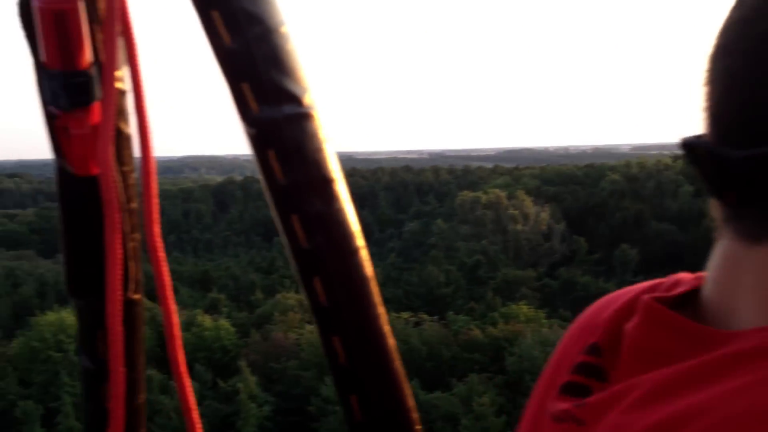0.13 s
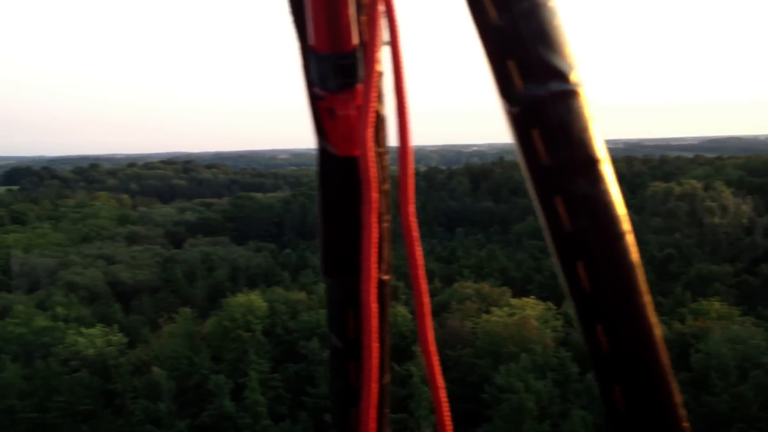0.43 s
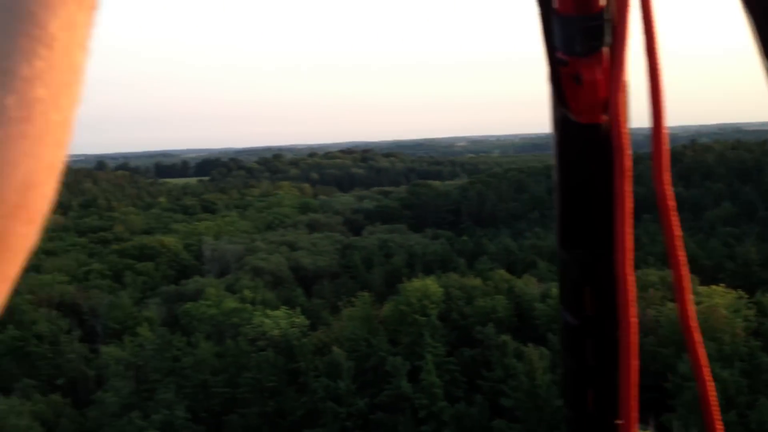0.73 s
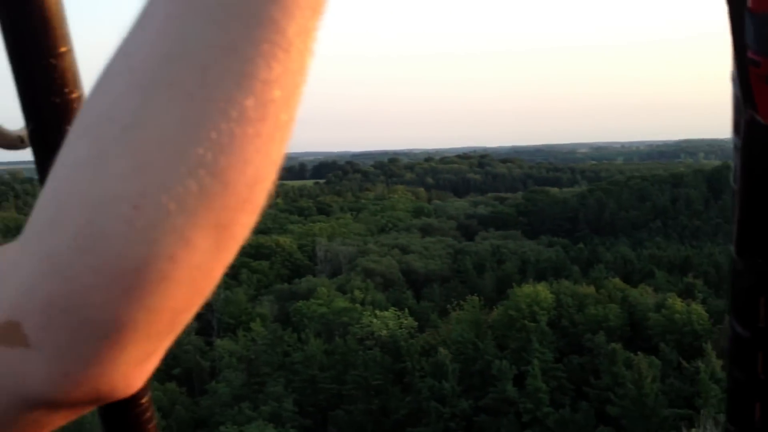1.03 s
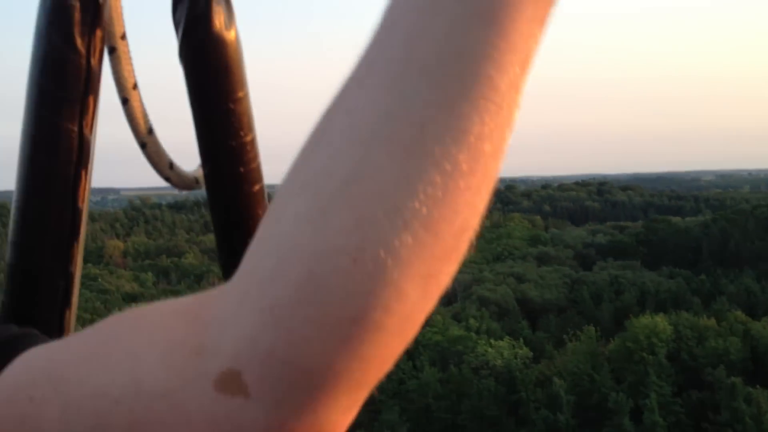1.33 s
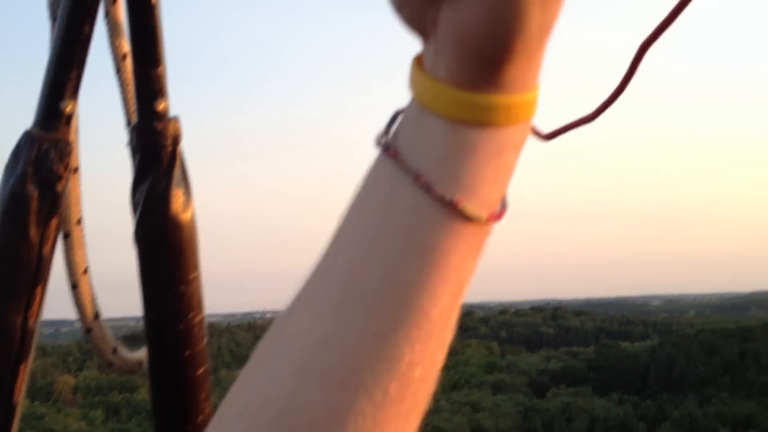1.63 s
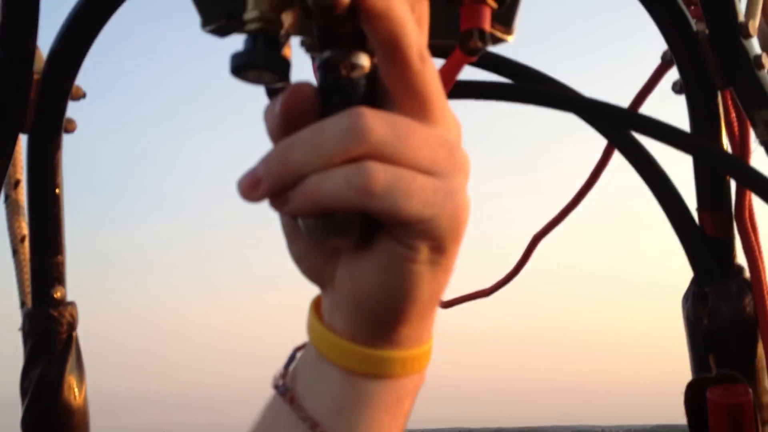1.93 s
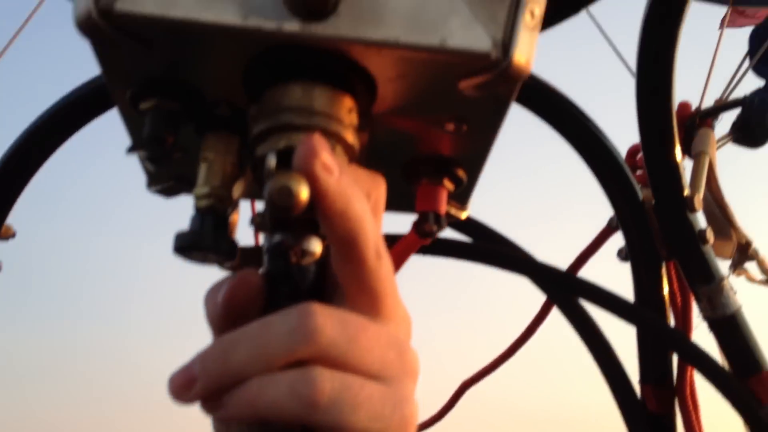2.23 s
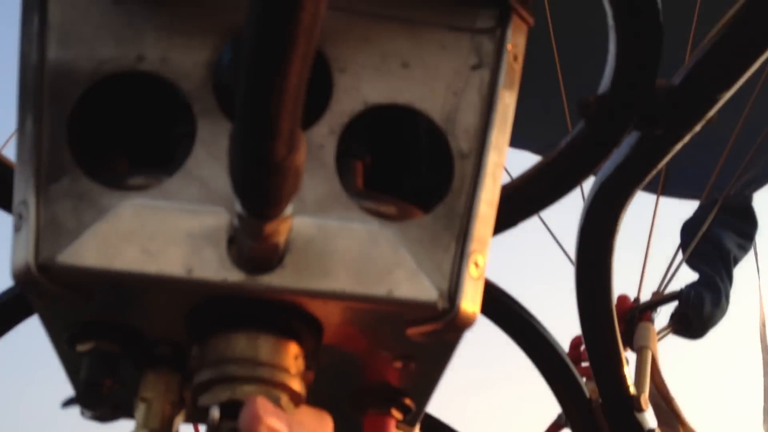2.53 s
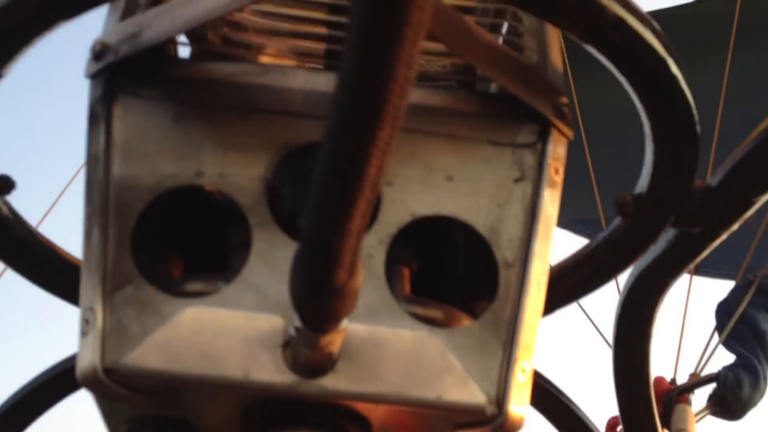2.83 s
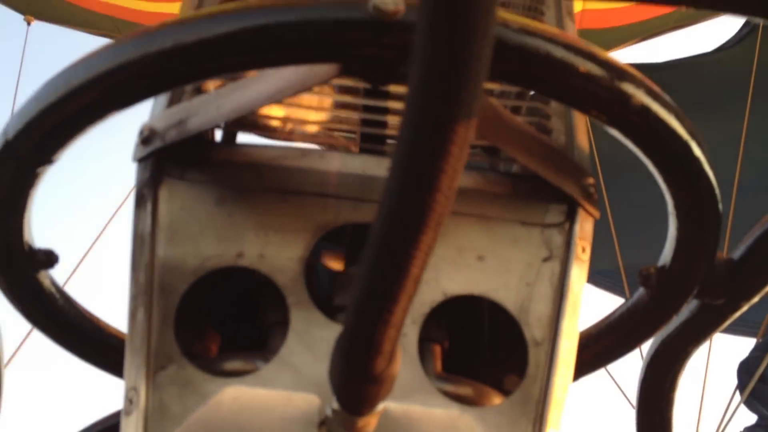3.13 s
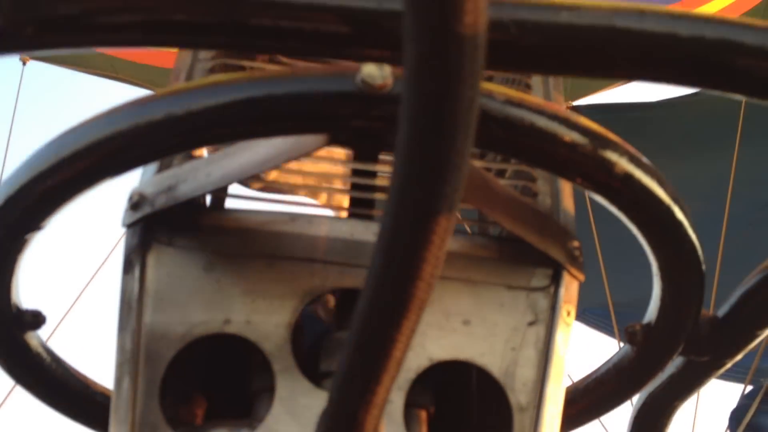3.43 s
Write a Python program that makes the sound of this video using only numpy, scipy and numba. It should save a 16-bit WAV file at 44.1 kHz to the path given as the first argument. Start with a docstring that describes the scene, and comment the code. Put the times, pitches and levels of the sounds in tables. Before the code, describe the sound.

Loud gas burner blast from close below cuts off abruptly, leaving faint hissing and two dull knocks.

```python
"""A hot-air balloon's burner, heard from just below it through the microphone of a hand-held camera.
First the flame roars and the gas jet hisses: coloured noise that flutters, with bands sliding as the camera moves.
The camera tilts up to face the burner, the hiss changes colour, and the valve shuts.
The pilot flame is left hissing and ringing its tube, narrow noise of drifting pitch, over a low wash of air.
Close by, the grip rubs and bumps the camera; two dull knocks stand out, blows on a damped body."""
import sys
import numpy as np
from scipy import signal
from scipy.fft import rfft, irfft
from scipy.io import wavfile
from scipy.ndimage import uniform_filter1d, minimum_filter1d, map_coordinates
from numba import njit

SR = 44100
rng = np.random.default_rng(int(sys.argv[2]) if len(sys.argv) > 2 else 0)


def generate_wav(sig):
    """Save sig (samples, or channels by samples) to the path in sys.argv[1] as 16-bit PCM at SR."""
    pcm = np.round(np.clip(np.atleast_2d(sig).T, -1, 1) * 32767).astype(np.int16)
    wavfile.write(sys.argv[1], SR, pcm)


N = 158760


def undb(db):
    """Decibels to gain."""
    return 10 ** (np.asarray(db) / 20)


def unit(x):
    """Scale to an rms of 1."""
    return x / np.sqrt(np.mean(x ** 2))


def times():
    """Time of every sample (s)."""
    return np.arange(N) / SR


def freqs():
    """Frequency of every spectral bin (Hz), kept at 1 or more."""
    return np.maximum(np.arange(N // 2 + 1) * SR / N, 1)


def curve(table, index=1):
    """One column of a table, joined by straight lines in time and held beyond its ends."""
    rows = np.array(table)
    return np.interp(times(), rows[:, 0], rows[:, index])


def noise(gain):
    """Noise of rms 1 with the given gain per bin."""
    return unit(irfft(rfft(rng.standard_normal(N)) * gain, N))


def coloured(points):
    """Noise of rms 1 with a spectrum of (Hz, dB) points, joined over log frequency."""
    hz, db = np.array(points).T
    return noise(undb(np.interp(np.log(freqs()), np.log(hz), db)))


def walk(rate_hz):
    """Smooth random movement of rms 1, whose spectrum fades out around rate_hz."""
    return noise(np.exp(-(freqs() / rate_hz) ** 2))


def burst(start, length):
    """Short rise, hold and short fall; the very shortest do not reach 1."""
    edge_s = 0.0097
    t = times() - start
    return np.clip(np.minimum(t, length - t) / edge_s + .5, 0, 1)


@njit
def bandpass(x, hz, width):
    """State-variable band-pass with a moving centre, gain 1 there."""
    y, band, low = np.empty(len(x)), 0., 0.
    for i in range(len(x)):
        g = np.tan(np.pi * hz[i] / SR)
        k = width / hz[i]
        v = (band + g * (x[i] - low)) / (1 + g * (g + k))
        band, low, y[i] = 2 * v - band, low + 2 * g * v, k * v
    return y


def moving_band(x, path, width_hz):
    """Lift or cut a band of x along a path of (s, centre Hz, dB)."""
    return x + (undb(curve(path, index=2)) - 1) * bandpass(x, curve(path), float(width_hz))


def valve_closing():
    """The closing valve chokes the gas ever faster: 0 while open, 1 after shut_s, and on upward."""
    start_s, shut_s, exponent = 1.9726, 0.13, 2.1
    return np.maximum((times() - start_s) / shut_s, 0) ** exponent


def roar(flutter, closing):
    """The turbulent flame: low noise that puffs and flutters, and dies as the valve closes."""
    # Colour of the flame: pitch_hz, level_db per Hz
    flame_colour = [(25, -48), (55, -56), (80, -21.5), (100, -22.5), (130, -6.5), (170, -2), (238, 0.8),
                    (295, -4), (340, -2), (395, -7.5), (440, -3.5), (490, -8.5), (550, -5), (690, -11),
                    (780, -12.5), (860, -20), (1200, -28.5), (1550, -23), (2000, -38.5), (5000, -37)]
    # Level of the roar's body and of its upper part: time_s, body_db, upper_db
    flame_level = [(0, -8.5, -14), (.4, -11.5, -11), (.8, -11, -13), (1.2, -11.5, -10), (1.6, -11, -10),
                   (1.85, -14, -11), (2.0, -14, -13.5)]
    # Resonance that rises as the camera nears the burner, then sinks a little: time_s, centre_hz, lift_db
    flame_resonance = [(0, 328, 0), (.4, 480, 0.5), (.75, 620, 2.5), (1.2, 720, 3.5), (1.6, 686, 0.5),
                       (2.0, 600, 2)]
    split_hz, resonance_width_hz = 270, 200
    flutter_db, puff_db, puff_rate_hz, shut_db = -0.5, 1.4, 23, -20.5
    flame = coloured(flame_colour)
    body = irfft(rfft(flame) / (1 + (freqs() / split_hz) ** 4), N)
    upper = flame - body
    sound = body * undb(curve(flame_level)) + upper * undb(curve(flame_level, index=2))
    sound = moving_band(sound, flame_resonance, resonance_width_hz)
    return sound * undb(flutter_db * flutter + puff_db * walk(puff_rate_hz) + shut_db * closing)


def sweep(x):
    """Reflections off the nearby frame and arm cut a hollow and lift two bands, which move with the camera."""
    # Hollow in the hiss, mostly a cut: time_s, centre_hz, gain_db
    hollow_path = [(0, 2130, -6), (.2, 2050, -8), (.35, 1600, -4), (.7, 1650, 0.5), (1.0, 1770, -10),
                   (1.25, 2250, -8), (1.5, 2080, -6), (1.7, 1500, -4), (1.85, 1500, -5)]
    # Lower bright band: time_s, centre_hz, gain_db
    low_path = [(0, 5000, 0.5), (.25, 4480, 2.5), (.5, 4300, 2.5), (.63, 3370, 5), (.9, 3370, 2.5),
                (1.12, 3800, 6.5), (1.35, 3900, 6), (1.55, 3580, 7), (1.8, 3250, -2.5)]
    # Upper bright band: time_s, centre_hz, gain_db
    high_path = [(0, 7900, 2), (.35, 7700, 0), (.65, 7160, 3), (1.05, 6760, 3), (1.3, 7150, -1.5),
                 (1.55, 6760, 5.5), (1.75, 7700, -0.5), (1.9, 7800, 4)]
    for path, width_hz in ((hollow_path, 640), (low_path, 370), (high_path, 650)):
        x = moving_band(x, path, width_hz)
    return unit(x)


def drift(x):
    """The colour of the hiss drifts: neighbouring bands slowly swell and sink against each other."""
    depth_db, rate_hz, band_hz, bands = 1.0, 2, 386, 25
    spectrum = rfft(x)
    place = np.minimum(freqs() / band_hz, bands - 1)  # the last band takes all the treble above it
    out = 0
    for k in range(bands):
        overlap = np.maximum(1 - np.abs(place - k), 0)
        out = out + irfft(spectrum * overlap, N) * undb(depth_db * walk(rate_hz))
    return out


def jet(flutter, closing):
    """The gas jet's broad hiss, crossfaded from its side colour to its facing colour as the camera tilts."""
    # Jet heard from the side: pitch_hz, level_db per Hz
    side_colour = [(500, -10), (1000, 3.5), (1500, 2), (1850, 1.5), (2350, 2.5), (3050, -0.5), (3400, 0),
                   (3900, -0.5), (4400, 1), (5200, 1.5), (5800, -1.5), (6900, 1), (7700, 0.5), (8600, 2.5),
                   (9300, -3), (12000, -1.1), (15500, -1.5)]
    # Jet with the camera facing it: pitch_hz, level_db per Hz
    facing_colour = [(500, -15), (900, 7), (1150, 16), (1400, -1), (1700, 7), (2100, 8), (2650, -7),
                     (3250, 5.5), (3800, -4.5), (4400, -3), (4780, 5), (5450, -8), (6300, 1.5), (7000, -5),
                     (7800, -3), (9900, -7), (11000, -4.5), (15500, -5.5)]
    # Start and end of the tilt: start_s, end_s
    tilt_span = (1.666, 1.93)
    # Level of the jet with the valve open: time_s, level_db
    jet_level = [(0, -15), (.6, -15.5), (1.15, -15), (1.45, -17.5), (1.72, -17), (1.8, -19), (1.95, -21),
                 (2.03, -20.5)]
    flutter_db, shut_db = 0.76, -23.5
    facing = np.interp(times(), tilt_span, [0, 1])
    hiss = np.sqrt(1 - facing) * coloured(side_colour) + np.sqrt(facing) * coloured(facing_colour)
    return drift(sweep(hiss)) * undb(curve(jet_level) + flutter_db * flutter + shut_db * closing)


def burner():
    """Roar and jet share one flutter, in opposite directions, and one valve."""
    flutter, closing = walk(44.7), valve_closing()
    return roar(flutter, closing) + jet(flutter, closing)


def ring(hz, half_width_hz):
    """A tube resonance on the verge of whistling: narrow noise whose swings in level are evened out."""
    evenness = 0.13  # 0 = plain noise, 1 = a nearly steady whistle
    z = signal.hilbert(noise(1 / (1 + ((freqs() - hz) / half_width_hz) ** 2)))
    return unit(z.real / (np.abs(z) + .3) ** evenness)


def pilot():
    """The small flame hisses, spits and rings its tube, whose pitch drifts with the flow."""
    # Broad hiss of the pilot: pitch_hz, level_db per Hz
    hiss_colour = [(300, -13), (1000, 3), (1900, -4.5), (3000, 2.5), (4500, 4.5), (6000, 2), (7600, 5.5),
                   (10500, -1), (12200, 1), (13500, -3), (15500, 2)]
    # Level of the broad hiss: time_s, level_db
    hiss_level = [(2.15, -58), (2.35, -54.5), (2.5, -55.5), (2.65, -54.5), (2.9, -53), (3.15, -49),
                  (3.45, -47), (3.6, -48)]
    # Brief spits, added to the hiss's gain: start_s, length_s, level_db before the burst shape
    spit_list = [(2.532, 0.016, -55), (3.5255, 0.0027, -35), (3.545, .012, -50)]
    # Tube resonances, lowest first: pitch_hz before the drift, half_width_hz, relative level_db
    tube_modes = [(2370, 80, 2), (3760, 55, -7), (4910, 110, 2.5), (7230, 85, -6.5), (9400, 130, -10),
                  (11850, 350, -5.5)]
    # Tube ringing: time_s, level_db, pitch_ratio, level of upper resonances against the lowest_db
    tube_path = [(2.15, -65, 1.06, 3), (2.39, -58, 1.025, -5), (2.46, -55.5, 1.03, -2),
                 (2.6, -55.5, 0.99, 0), (2.8, -54, 1, 1), (2.93, -52, 1.005, 1), (3.03, -54, 1.005, -1),
                 (3.13, -48.5, 1.035, -3), (3.31, -55.5, 1.02, 1.5), (3.43, -49.5, 1.062, 6.5),
                 (3.6, -54.5, 1.025, 4)]
    flicker_db, flicker_rate_hz = 1.55, 60
    rings = [undb(db) * ring(hz, half_width_hz) for hz, half_width_hz, db in tube_modes]
    tube = unit(rings[0] + sum(rings[1:]) * undb(curve(tube_path, index=3)))
    # reading the ringing faster or slower bends its pitch
    read_at = np.cumsum(curve(tube_path, index=2))
    tube = map_coordinates(tube, [read_at], mode="mirror")
    flow = undb(curve(hiss_level) + flicker_db * walk(flicker_rate_hz))
    for start, length, db in spit_list:
        flow = flow + undb(db) * burst(start, length)
    return coloured(hiss_colour) * flow + tube * undb(curve(tube_path))


def air_wash():
    """Low wash of air and dying flame: dull noise whose level gusts."""
    # Colour of the wash: pitch_hz, level_db per Hz
    wash_colour = [(25, -47.5), (60, -29), (120, -6), (220, 2), (320, -7.5), (500, -7.5), (900, -19),
                   (2000, -23.5), (5000, -44)]
    # Level of the wash: time_s, level_db
    wash_level = [(2.1, -33.5), (2.16, -47), (2.23, -47), (2.38, -48.5), (2.5, -48.5), (2.6, -54),
                  (3.0, -50.5), (3.6, -50)]
    gust_db, gust_rate_hz = 2, 11
    return coloured(wash_colour) * undb(curve(wash_level) + gust_db * walk(gust_rate_hz))


def rubs():
    """Short dull shudders as the grip shifts: bursts of low noise around a centre, over a deeper shudder."""
    # Rubs of the hand on the camera: start_s, length_s, rms level_db before the low cut, centre_hz
    rub_list = [(2.18, 0.04, -36.5, 196), (2.283, 0.1, -37, 228), (2.719, 0.043, -44, 165),
                (2.834, 0.029, -40.5, 270), (2.87, 0.019, -30, 173), (2.897, 0.021, -46, 190),
                (3.129, 0.066, -38.5, 193), (3.233, 0.024, -36.5, 150), (3.29, 0.046, -45, 200),
                (3.355, 0.058, -45, 188), (3.412, 0.044, -35.5, 180)]
    width_octaves, skirt_db = 0.39, -13
    shudder_hz, shudder_db, low_cut_hz = 118, -11, 82
    deep = undb(shudder_db) * np.exp(-(np.log2(freqs() / shudder_hz) / width_octaves) ** 2)
    out = 0
    for start, length, db, hz in rub_list:
        away = (np.log2(freqs() / hz) / width_octaves) ** 2
        shape = burst(start, length)
        rub = shape * noise(np.exp(-away / 2) + undb(skirt_db) * np.exp(-away / 9) + deep)
        out = out + undb(db) * rub * np.sqrt(np.sum(shape ** 2) / np.sum(rub ** 2))
    return irfft(rfft(out) / (1 + (low_cut_hz / freqs()) ** 4), N)


def knocks():
    """Each blow pushes a heavily damped body; the softer the contact, the duller the bump."""
    # Knocks and soft bumps of handling: centre_s, peak_db, contact_ms (spread of the bell-shaped push)
    blow_list = [(2.2691, -27, 0.61), (2.2755, -25, 0.69), (2.3189, -21.5, 0.29), (2.3241, -7.5, 0.28),
                 (2.369, -25, 0.34), (2.3784, -28, .63), (2.7223, -31, 1.6), (2.7442, -33, 1.7),
                 (2.7902, -30.5, 1.1), (2.8592, -25, 0.33), (2.8678, -25, 1.3), (2.8803, -13.5, 0.34),
                 (3.0813, -34, 0.82), (3.1787, -29, 0.76), (3.1997, -32, 1.9), (3.2392, -29, 0.42),
                 (3.2422, -31, .58), (3.2652, -29, 0.19), (3.3474, -28.5, 0.8), (3.3609, -24, 1.3),
                 (3.4185, -28.5, 2), (3.5063, -32, 1.9), (3.5833, -27, 0.42), (3.5913, -28, 0.76)]
    # Modes of the knocked body: pitch_hz, q, level_db
    body_modes = [(153, 3.7, -8.5), (221, 1.9, 0), (305, 1, 1.5), (620, 2, -21), (1200, 2.6, -5)]
    low_cut_hz = 113
    f = freqs()
    t = np.arange(-2048, 2048) / SR
    body = sum(undb(db) / (1 + 1j * q * (f / hz - hz / f)) for hz, q, db in body_modes)
    body = body / (1 + (low_cut_hz / f) ** 6)
    body = np.interp(np.fft.rfftfreq(len(t), 1 / SR), f, body)
    out = np.zeros(N + len(t))
    for at, db, contact_ms in blow_list:
        push = np.exp(-.5 * (t * 1000 / contact_ms) ** 2)
        swing = irfft(rfft(push) * body)
        first = int((at + t[0]) * SR)
        out[first:first + len(t)] += undb(db) * swing / np.abs(swing).max()
    return out[:N]


def scene():
    """One microphone: both channels are alike."""
    mid = burner() + pilot() + air_wash() + rubs() + knocks()
    return np.array([mid, mid])


def record(dry):
    """A fast limiter ducks the highest peaks; the top is cut."""
    drive_db, limit, hold_s, top_hz = 0.21, 1, 0.0049, 15300
    x = dry * undb(drive_db)
    hold = max(int(hold_s * SR), 3)
    peak = np.abs(x).max(axis=0)
    needed = limit / np.maximum(peak, limit)
    gain = uniform_filter1d(minimum_filter1d(needed, hold), hold)
    return signal.fftconvolve(x * gain, signal.firwin(601, top_hz, fs=SR)[None], mode="same")


dry = scene()
out = record(dry)
generate_wav(out)
```